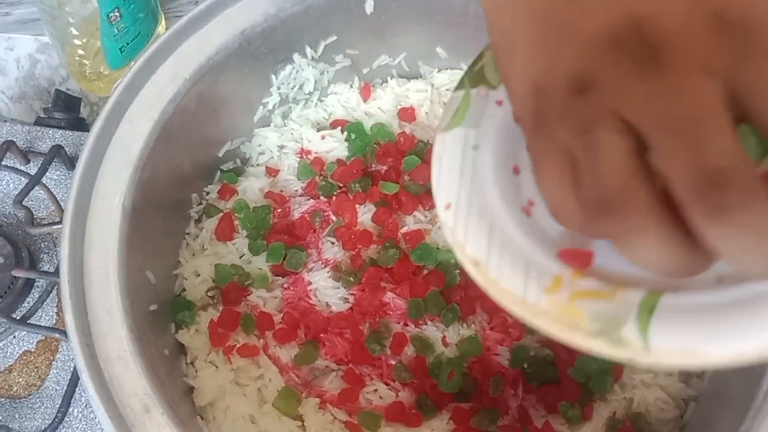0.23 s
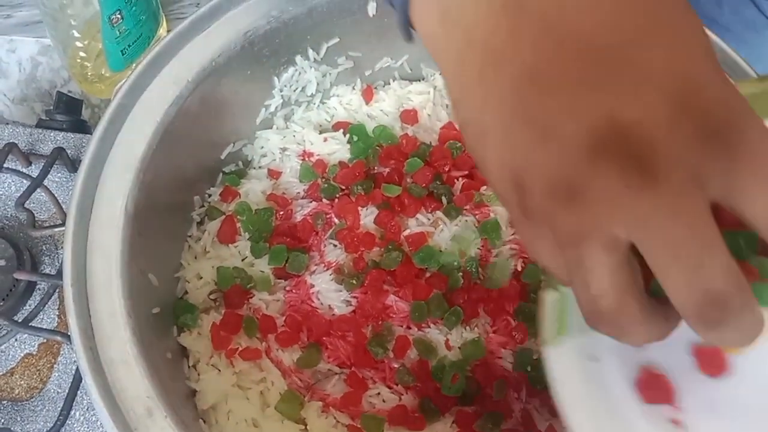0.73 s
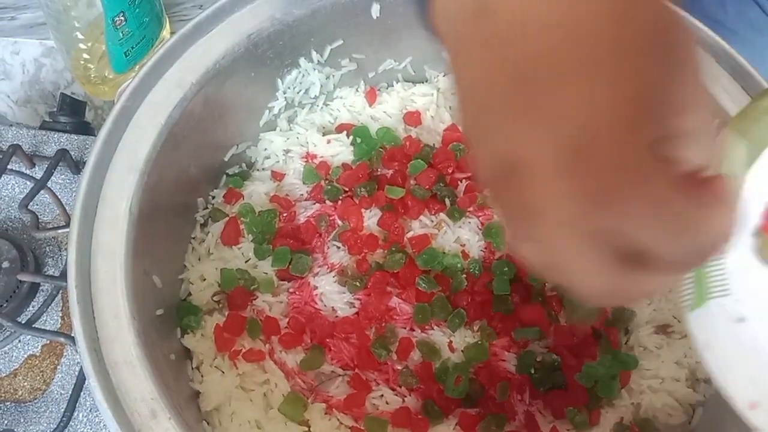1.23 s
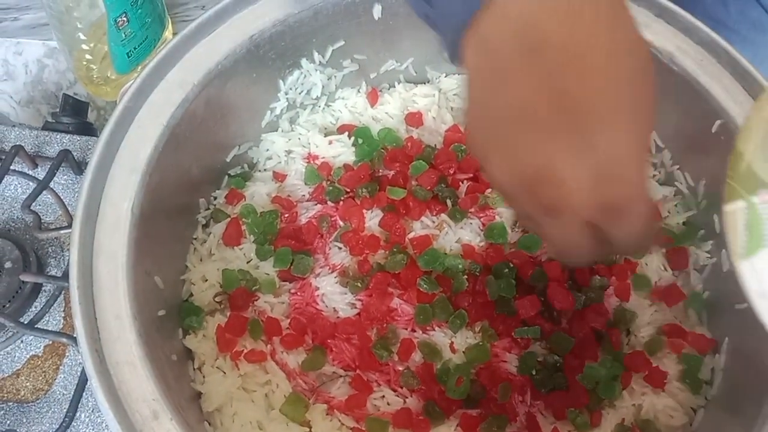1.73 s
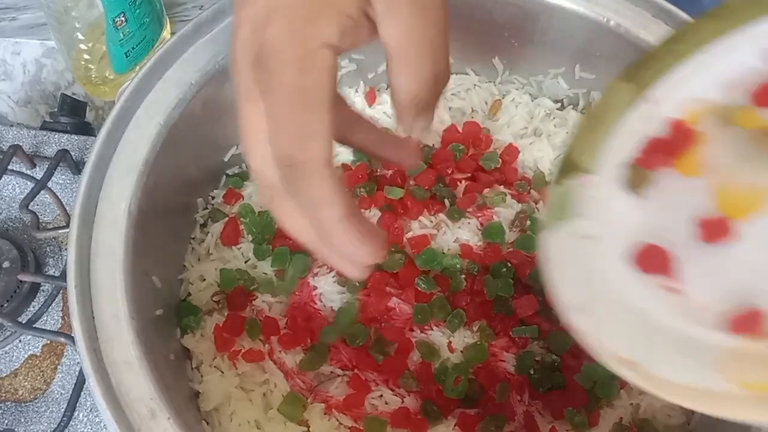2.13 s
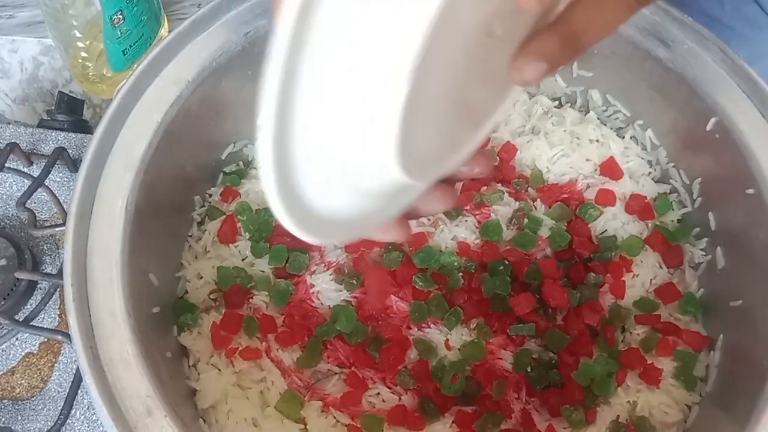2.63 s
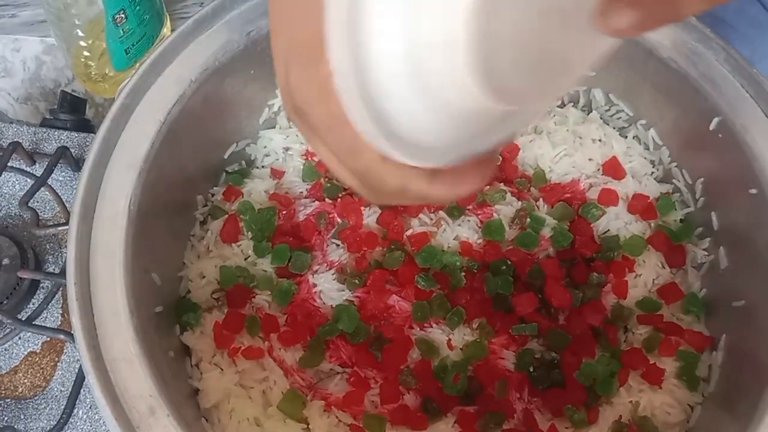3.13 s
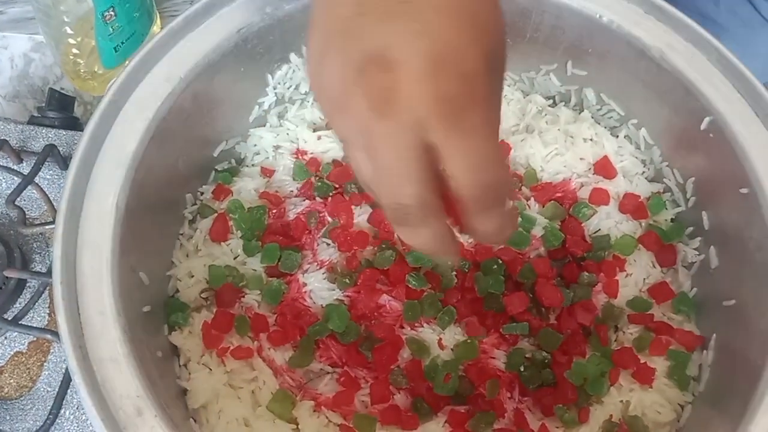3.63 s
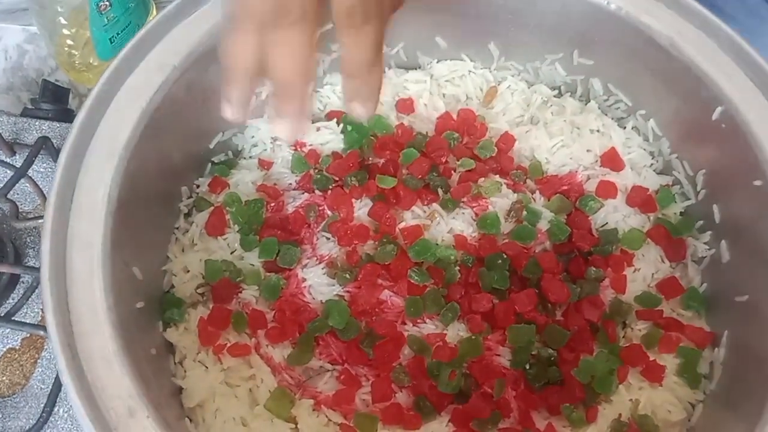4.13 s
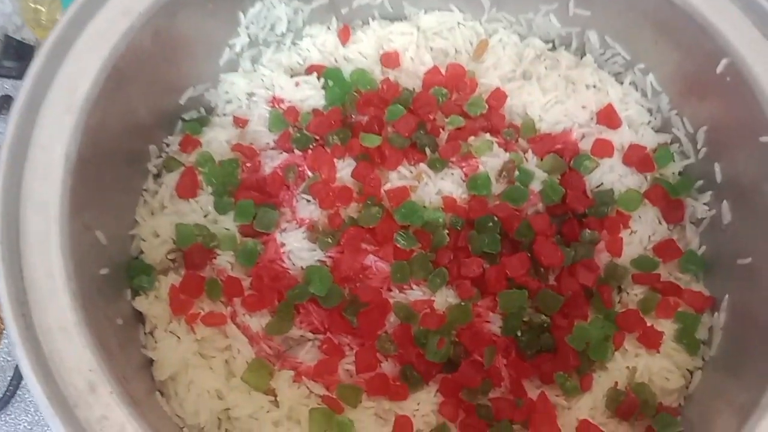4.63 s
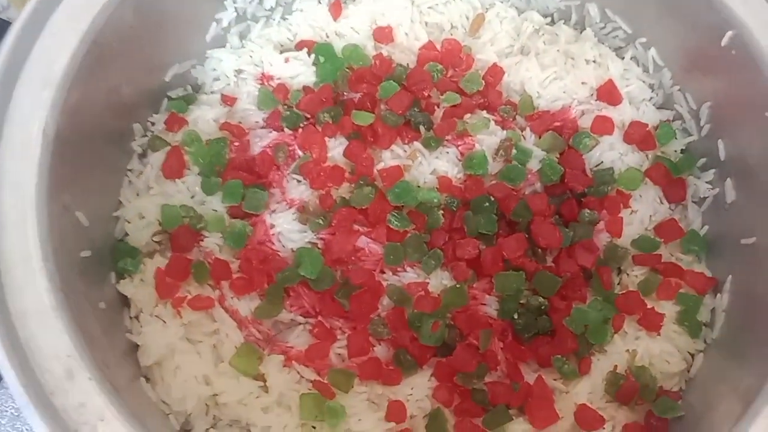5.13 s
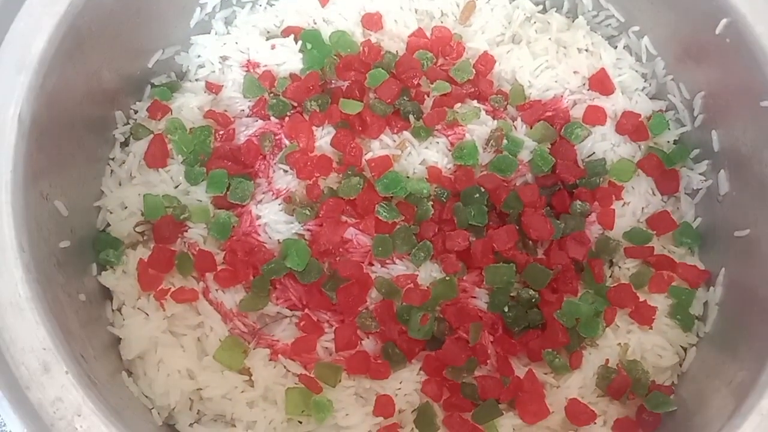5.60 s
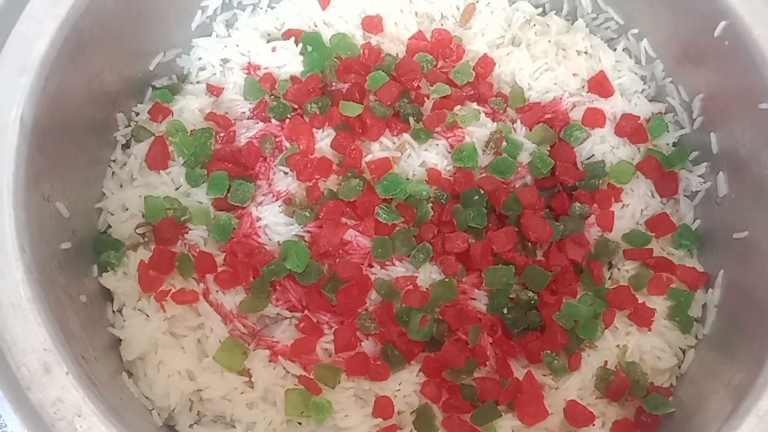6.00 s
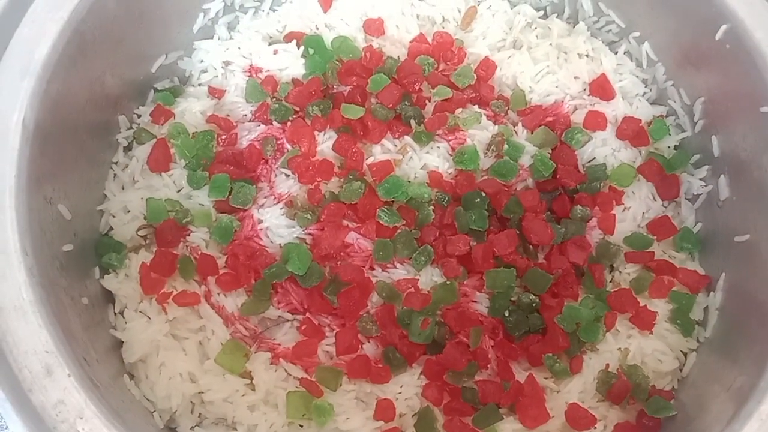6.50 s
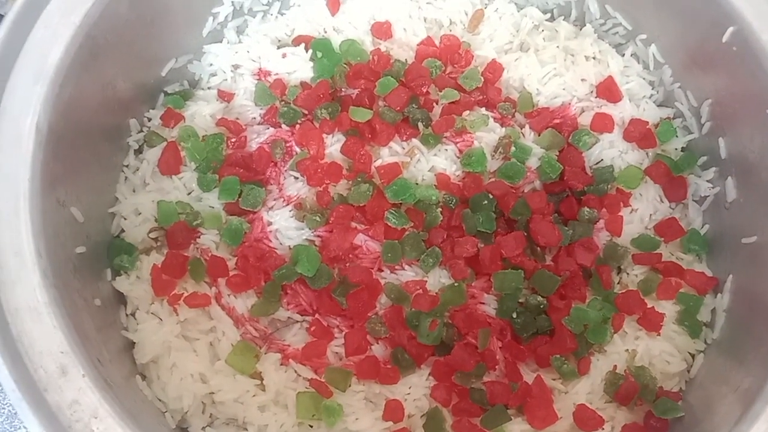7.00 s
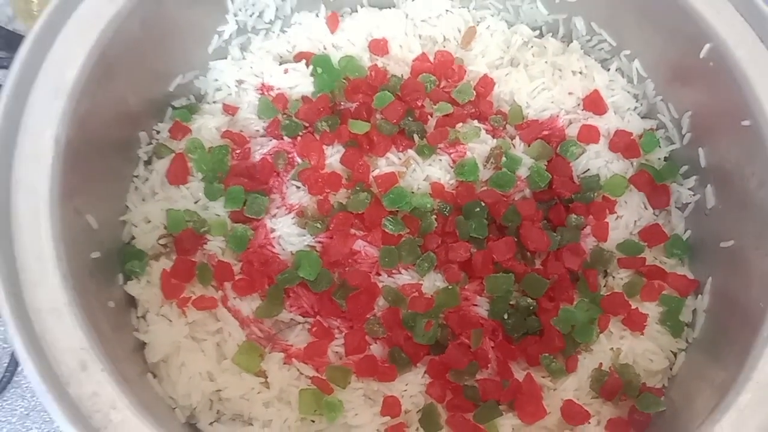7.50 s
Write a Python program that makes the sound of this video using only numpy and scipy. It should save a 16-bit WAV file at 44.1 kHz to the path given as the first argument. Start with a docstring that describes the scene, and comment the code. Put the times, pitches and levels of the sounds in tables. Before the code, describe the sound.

A big pot sizzles steadily on a gas burner while fruit pieces tick down, a plastic dish is set aside, and hard knocks follow.

```python
"""A wide pot of rice hisses and sizzles on a gas burner throughout: coloured noise in tiny bursts over a roar.
From the start, fruit scattered by hand ticks as short rings with cracks, and wood is dragged as jolted modes.
Near the middle a dish rim squeaks, then the plastic dish is put down and slid: chattering modes, then a rasp.
Later the wood is knocked hard, ringing on two modes at a time; near the end a finger bumps the phone.
A hard kitchen answers; the phone's noise suppressor pushes steady sound down, so that it breaks into patches."""
import sys
import numpy as np
from scipy import signal
from scipy.fft import rfft, irfft, next_fast_len
from scipy.io import wavfile
from scipy.ndimage import uniform_filter1d, minimum_filter1d, map_coordinates

SR = 44100
rng = np.random.default_rng(int(sys.argv[2]) if len(sys.argv) > 2 else 0)


def how_loud(loudness_db):
    """Turn decibels into a plain amplitude multiplier (0 dB gives 1, 20 dB gives 10)."""
    steps = np.asarray(loudness_db, float) / 20
    return 10 ** steps


def inscribe(sig):
    """Save sig as 16-bit PCM at rate SR to the path in sys.argv[1].

    A 1-D sig is mono; a 2-D sig holds one channel per row.
    Samples are clipped to [-1, 1] before scaling.
    """
    pcm = np.round(np.clip(np.atleast_2d(sig).T, -1, 1) * 32767)
    wavfile.write(sys.argv[1], SR, pcm.astype(np.int16))


N = 341775  # length in samples

# Ticks of fruit, nails and spitting fat.
# Each row: start in seconds, ring level in dB, ring pitch in Hz, crack level in dB before its colour.
TICKS = [(0.128, -30, 2480, -54), (0.186, -49, 3020, -44), (0.264, -38, 2680, -66),
         (0.3785, -34.5, 960, -60), (0.47, -43, 2400, -45), (0.484, -40.5, 3340, -60),
         (0.7939, -43, 1120, -60), (0.813, -42.5, 1230, -48.5), (0.8598, -46, 1000, -51),
         (1.009, -44, 3630, -60), (1.1729, -37.5, 2500, -72), (1.1887, -41.5, 1900, -46),
         (1.2116, -35, 2550, -39), (1.3324, -38.5, 2560, -51), (1.353, -35, 3480, -38),
         (1.4174, -35, 2520, -40), (1.4443, -25, 2810, -28), (1.5207, -38, 1370, -39.5),
         (1.6622, -35, 892, -35.5), (1.695, -36, 3270, -34), (1.669, -36, 2680, -46),
         (1.7186, -52, 3500, -46), (1.7963, -46, 2680, -59), (1.873, -39, 2730, -70),
         (1.9997, -35.5, 3390, -33), (2.3496, -34, 3220, -41), (2.3836, -40, 2340, -41.5),
         (2.7784, -37, 2940, -39), (3.888, -37, 3020, -70), (4.376, -36, 1020, -24),
         (4.4015, -27.5, 1120, -30), (4.5101, -27.5, 3370, -55), (4.785, -32, 1020, -29.5),
         (4.8364, -27, 2020, -49), (4.8747, -11, 2500, -24), (5.7725, -32.5, 2900, -48),
         (5.8483, -40, 2520, -34), (5.9554, -32, 3350, -52), (6.099, -42, 3260, -52),
         (6.1295, -43, 890, -36.5), (6.4173, -40, 3480, -37), (6.6964, -21, 890, -33.5),
         (6.7376, -31, 1330, -39), (6.75, -34, 4030, -34), (7.5545, -38, 1270, -39.5),
         (7.6852, -32, 1300, -47)]
# Colour of a tick's sharp edge. Each row: frequency in Hz, gain in dB.
CRACK_COLOUR = [(2500, -13), (4500, 9), (8000, -1), (9300, -16), (11300, -19), (12800, -9), (15600, -23),
                (16600, -27)]
# The dish rings as it lands or is jolted. Each row: time of the peak in seconds, level in dB, fade in seconds.
DISH_RINGS = [(4.41, -28, 0.31), (4.5, -37, 0.18), (4.59, -46.5, 1.3), (4.786, -48.5, 1.1),
              (4.904, -39, 0.16)]
# The dish rattles. Each row: time of the peak in seconds, level in dB, fade in seconds.
DISH_RATTLES = [(4.376, -37, 0.68), (4.43, -48, 0.53), (4.5, -59, 0.36)]
# The dish slides and rustles.
# Each row: time of the peak in seconds, level in dB, fade in seconds, middle of the rasp in Hz.
SLIDES = [(4.787, -29, 0.77, 1990), (4.835, -28.5, 0.24, 2000), (4.887, -25, 0.1, 2150),
          (4.909, -32, 0.89, 2180), (5.45, -51.5, 1.7, 2830), (5.712, -63, 0.46, 2950),
          (5.775, -44.5, 0.039, 2800), (5.82, -52, 1.3, 2700), (6.658, -32, .15, 2700),
          (6.702, -28.5, 0.43, 2200), (6.84, -33, 0.3, 1950), (7.02, -42.5, 0.19, 2850),
          (7.69, -44.5, 2.5, 2450)]
# Short squeaky scrapes of the dish rim. Each row: time of the peak in seconds, level in dB, fade in seconds.
SQUEAKS = [(3.786, -38.5, 0.31), (3.83, -43, 0.17), (3.868, -45, 0.15)]
# The squeak slips from the rim's upper modes to its lower: begin and end in seconds.
SQUEAK_SINKS_S = (3.78, 3.92)
# Resonances of the dish. Each row: pitch in Hz, width in Hz, relative level in dB (width and level of one pass).
DISH_MODES = [(520, 62, -4.5), (1020, 79, 4), (1244, 175, -1.5), (1414, 50, -0.5)]
# Resonances of the dish rim. Each row: pitch in Hz, width in Hz, relative level in dB, for one pass.
RIM_MODES = [(1870, 240, 1), (2100, 80, 0.5), (2520, 280, -4)]
# Colour of the sliding rasp. Each row: frequency in Hz, relative level in dB.
RASP_COLOUR = [(350, -56), (600, -53), (906, -27.5), (997, 11), (1140, -22), (1240, 7), (1350, -1),
               (2310, -1.5), (4050, -6), (7210, -15.5), (9240, -41.5), (13200, -46), (16000, -59)]
# Blunt knocks that ring on two modes. Each row: start in seconds, level in dB, lower mode in Hz,
# upper mode in Hz, upper mode in dB against the lower, time to fall by 60 dB in seconds.
KNOCKS = [(3.04, -39.5, 273, 391, -3.5, 0.24), (3.085, -36, 300, 408, -1.5, 0.077),
          (3.557, -29, 410, 672, 1.5, 0.048), (3.605, -40, 312, 520, -1.5, 0.07),
          (4.374, -34, 520, 992, 10.5, 0.14), (4.402, -35, 536, 1025, 9.5, 0.21),
          (5.843, -34.5, 2610, 3040, -9, 0.24), (6.647, -13.5, 464, 920, -2, 0.063),
          (6.70, -28, 473, 924, -4, 0.11), (6.738, -14.5, 396, 1367, -9, 0.066),
          (6.785, -22.5, 309, 915, -4, 0.07), (6.83, -16.5, 250, 907, -8, 0.093)]
# Wood dragged or bumped. Each row: time of the peak in seconds, level in dB at the pitch where it speaks,
# that pitch in Hz, fade in seconds.
DRAGS = [(.16, -69, 450, 0.55), (0.209, -60, 450, 0.096), (0.282, -42, 700, 0.076),
         (1.264, -59.5, 440, 0.089), (1.36, -62, 900, 0.55), (1.451, -47.5, 613, 0.054),
         (1.528, -63, 450, 0.23), (2.25, -54, 312, 0.25), (2.39, -59, 520, 0.65), (2.544, -66, 260, 0.28),
         (2.56, -54, 900, 0.4), (3.045, -38.5, 245, 0.22), (3.22, -59, 270, 0.4), (3.326, -68, 900, 0.052),
         (3.414, -66, 450, 0.51), (3.562, -49, 460, 0.37), (3.602, -55, 270, 0.11),
         (3.648, -42.5, 520, 0.076), (4.741, -49, 395, 0.54), (4.791, -40.5, 670, 0.98),
         (4.898, -46, 900, 0.11), (4.899, -52, 270, 0.15), (5.017, -45, 307, 0.26), (5.09, -54, 297, .25),
         (5.415, -57, 417, 0.27), (5.47, -46, 238, 0.67), (5.52, -40, 250, 0.2), (5.585, -46, 520, 0.17),
         (5.845, -56, 434, 0.27), (5.898, -40, 378, 0.15), (5.96, -58, 280, 0.17), (6.17, -65.5, 338, 0.73),
         (6.652, -23, 417, .15), (6.672, -23, 900, .6), (6.718, -23, 460, 0.45), (6.834, -26.5, 261, 0.28),
         (6.85, -34.5, 900, 0.55), (6.9, -33.5, 252, 0.32), (6.77, -32, 302, 0.41), (6.93, -53, 455, 0.3),
         (7.0, -43, 258, 0.28), (7.07, -58, 300, 0.34), (7.12, -62, 300, 0.13)]
# Resonances of the wood. Each row: pitch in Hz, width in Hz, relative level in dB, for one pass.
WOOD_MODES = [(236.8, 46, -4), (274, 20, 4), (315, 104, -2.5), (396, 62, -1), (482.4, 59, -0.5),
              (535.4, 43, -2), (689, 33, 1), (920, 52, 3.5), (1080, 82, -0.5), (1367, 65, 1),
              (1680, 280, -5)]
# Middle of the wood's deep, box and upper modes, in Hz.
WOOD_MIDDLES_HZ = (270, 441, 900)
# A finger bumps the phone. Each row: start in seconds, level of the spike in dB.
BUMPS = [(7.5128, -15.5)]
# The casing swings back after the bump: pitch in Hz, time to fall by 60 dB in seconds, dB against the spike.
CASING = (152, 0.015, -4)
# Level of the stove as heard: the phone's suppressor lets more roar through during loud knocks and slides.
# Each row: time in seconds, sizzle in dB, roar let through in dB, dull steam in dB.
STOVE_AS_HEARD = [(0, -52, -63, -57), (.3, -50.5, -66, -57.5), (.56, -54.5, -63.5, -60.5),
                  (.97, -53, -62, -57), (1.06, -57, -74, -64), (1.15, -54.5, -65, -61),
                  (1.2, -48.5, -60, -56.5), (1.45, -54.5, -61.5, -53.5), (1.62, -50.5, -63, -55),
                  (1.69, -49.5, -56, -50), (1.83, -49.5, -59.5, -57.5), (1.92, -52, -61.5, -59.5),
                  (2.5, -50.5, -63, -57), (2.75, -48.5, -63, -61.5), (2.87, -49, -58.5, -64.5),
                  (3.0, -48.5, -59, -60), (3.2, -49, -58.5, -63.5), (3.5, -49.5, -62, -57.5),
                  (3.74, -49.5, -66, -59), (3.87, -46, -55.5, -55.5), (4.08, -51.5, -73, -60.5),
                  (4.36, -48.5, -64, -66.5), (4.5, -44, -62, -48), (4.66, -44, -69, -63),
                  (4.85, -44, -49, -50), (5.2, -43, -54.5, -65), (5.35, -45, -71, -62),
                  (5.5, -41.5, -50, -53), (5.7, -43.5, -58.5, -56.5), (5.85, -40.5, -51.5, -64.5),
                  (6.0, -44.5, -53, -65), (6.07, -45.5, -71, -59), (6.13, -45, -53, -62),
                  (6.33, -46.5, -63, -72), (6.45, -47, -59, -68), (6.62, -47, -57.5, -73),
                  (6.84, -42, -32.5, -42), (7.0, -43.5, -57.5, -66.5), (7.45, -50, -62.5, -66),
                  (7.75, -47, -57, -60)]
# Colour of the sizzle. Each row: frequency in Hz, relative level in dB.
SIZZLE_COLOUR = [(1700, -51), (2200, -11.5), (2400, -5.5), (2900, 0.5), (3590, -2.5), (4550, -6),
                 (5000, -2.5), (5600, -14), (6100, -10), (6600, -13), (7570, -14.5), (8600, -21.5),
                 (9200, -38), (12400, -40)]
# Colour of the high spatter. Each row: frequency in Hz, relative level in dB.
SPATTER_COLOUR = [(8000, -34), (9000, -20), (9470, -6), (11200, -17), (12500, 7), (14000, -9), (15300, 2),
                  (15700, -20), (15900, -26)]
# Hollow resonances of the flame under the pot: the roar, then its overtone.
# Each row: pitch in Hz, width in Hz for one pass, level in dB (evened out, as each is scaled alone).
FLAME_MODES = [(842.5, 125, 0.5), (1281, 240, 0)]
# Resonances of the low hum. Each row: pitch in Hz, width in Hz, relative level in dB, for one pass.
HUM_MODES = [(143.7, 59, 2.5), (75, 125, -6.5)]
# The low hum swells briefly. Each row: time of the peak in seconds, level in dB, fade in seconds.
HUM_SWELLS = [(.17, -69, 0.37), (.27, -59, 0.11), (.39, -71, 0.25), (.97, -64, 0.086), (1.23, -68, 0.12),
              (1.69, -63, .2), (1.79, -62, .2), (2.25, -59, 0.18), (2.36, -72, 0.22), (2.5, -73, 0.43),
              (2.8, -80, 0.46), (3.06, -78, .5), (3.6, -70, 0.35), (3.83, -61, 0.27), (3.89, -50, 0.11),
              (3.97, -71, 0.12), (4.17, -60, .4), (4.33, -66, 0.18), (4.77, -55.5, 0.1), (5.33, -73, 0.23),
              (5.58, -60.5, 0.29), (5.91, -54.5, 0.067), (6.71, -55, 0.56), (6.86, -57, 0.22),
              (7.31, -64, 0.28), (7.51, -65, 0.36), (7.7, -70, 0.41)]
# Echo of the kitchen. Each row: frequency in Hz, time to fall by 60 dB in seconds.
KITCHEN = [(200, 0.18), (1000, 0.26), (3000, 0.13), (10000, 0.11)]
# Dips of the microphone port. Each row: frequency in Hz, half width in Hz, depth in dB.
NOTCHES = [(4970, 130, -16), (6080, 150, -9)]


def unit(x):
    """Scaled to rms 1."""
    return x / np.sqrt(np.mean(x ** 2) + 1e-20)


def along(points, hz):
    """Joins (Hz, value) points on a log frequency axis."""
    f, v = np.transpose(points)
    return np.interp(np.log(hz + 1), np.log(f + 1), v)


def curves(rows):
    """One value per sample for each column after the time."""
    s, *columns = np.transpose(rows)
    return [np.interp(np.arange(N) / SR, s, column) for column in columns]


def filtered(x, response):
    """Shapes the spectrum of x by a complex response of frequency."""
    m = next_fast_len(N + SR // 2)
    return irfft(rfft(x, m) * response(np.fft.rfftfreq(m, 1 / SR)), m)[:N]


def coloured(x, points):
    """Shapes the spectrum of x by (Hz, dB) points."""
    return filtered(x, lambda f: how_loud(along(points, f)))


def resonances(modes):
    """Causal response of (Hz, width, dB) modes, with signs that alternate."""
    def response(f):
        return sum((-1) ** k * how_loud(db) * 1j * f * width / (hz * hz - f * f + 1j * f * width)
                   for k, (hz, width, db) in enumerate(modes))
    return response


def tuned(x, modes):
    """Passes x through the modes twice, for dark valleys between them; rms 1."""
    return unit(filtered(x, lambda f: resonances(modes)(f) ** 2))


def grains(per_s, spread_db, hiss, puff_s=0.00084):
    """Random short puffs of uneven but bounded size on a bed of noise, rms 1."""
    timing, luck = rng.random((2, N))
    size = how_loud(-spread_db * np.log(luck + 1 / 30))
    hits = (timing < per_s / SR) * size
    puffs = signal.lfilter([1], [1, -np.exp(-1 / (puff_s * SR))], hits)
    return unit(np.hypot(unit(puffs), hiss) * rng.standard_normal(N))


def patchy(x, depth_db):
    """Narrow bands swell and fade on their own over about a tenth of a second; rms 1."""
    z = signal.stft(x, nperseg=512)[2]
    field = uniform_filter1d(rng.standard_normal(z.shape), size=3, axis=0)
    field = uniform_filter1d(field, size=18, axis=1)
    return unit(signal.istft(z * how_loud(depth_db * unit(field)), nperseg=512)[1][:N])


def strokes(rows, rise_s):
    """Sum of (s, peak dB, fade s) swells: up 60 dB in rise_s, down 60 dB in the fade."""
    out = np.zeros(N)
    for s, db, fade in rows:
        start = max(round((s - rise_s) * SR), 0)
        t = np.arange(start, min(round((s + fade) * SR), N)) / SR - s
        out[start:start + len(t)] += how_loud(db - 60 * np.maximum(-t / rise_s, t / fade))
    return out


def wobble(rate):
    """A smooth random curve through rate random points a second."""
    return map_coordinates(rng.standard_normal(400), [np.arange(N) * rate / SR])


def ticks():
    """A hard touch starts a short ring, loudest in its first cycles, with a noisy body and a sharper crack."""
    click_db, click_cycles, contact_s = 5, 10, .0003
    rings, cracks, t = np.zeros(N + SR), np.zeros(N + SR), np.arange(SR // 8) / SR
    noise = rng.standard_normal((len(TICKS), 2, len(t)))
    for (s, db, hz, crack_db), (soft, sharp) in zip(TICKS, noise):
        t60 = 0.022 * (1000 / hz) ** 0.23  # seconds; higher ticks die sooner
        fade = how_loud(-60 * t / t60) + how_loud(click_db - 60 * t * hz / click_cycles)
        ring = np.sin(2 * np.pi * hz * t) * fade * (1 - np.exp(-t / contact_s))
        band = signal.butter(2, [0.81 * hz, min(1.13 * hz, 9000)], "band", fs=SR)
        body = signal.lfilter(*band, soft) * how_loud(4.0 - 50 * t / t60)
        start = round(s * SR)
        rings[start:][:len(t)] += how_loud(db) * (ring + body)
        cracks[start:][:len(t)] += how_loud(crack_db - 60 * t / 0.012) * sharp
    thin_rings = filtered(rings[:N], lambda f: (1j * f / (450 + 1j * f)) ** 2)  # less bass
    return thin_rings + coloured(cracks[:N], CRACK_COLOUR)


def dish():
    """Chatter makes the dish rim squeak, and later sets the dish ringing as it lands; sliding makes a rasp of
    dense grains."""
    chatter = grains(per_s=250, spread_db=2.5, hiss=1.3)
    ring = strokes(DISH_RINGS, rise_s=0.089) * tuned(chatter, DISH_MODES)
    clatter = filtered(chatter, lambda f: how_loud(along(RASP_COLOUR, f)) * (f / 3000) ** 0.69)
    rattle = strokes(DISH_RATTLES, rise_s=0.02) * unit(clatter)

    rasp = coloured(grains(per_s=750, spread_db=1.0, hiss=1.4), RASP_COLOUR)
    low, high = (unit(filtered(rasp, resonances([(hz, 1300, 0)]))) for hz in (1900, 3100))
    middle_hz, = curves([(row[0], row[-1]) for row in SLIDES])
    up = np.clip((middle_hz - 1900) / 1200, 0, 1)  # share of the brighter rasp
    scrape = 0.52 * unit(rasp) + 0.29 * (np.sqrt(1 - up) * low + np.sqrt(up) * high)
    slide = strokes([row[:-1] for row in SLIDES], rise_s=0.043) * scrape

    sunk = np.interp(np.arange(N) / SR, SQUEAK_SINKS_S, (0, 1))
    upper, lower = tuned(chatter, RIM_MODES[1:]), tuned(chatter, RIM_MODES[:-1])
    squeak = strokes(SQUEAKS, rise_s=.05) * (np.sqrt(1 - sunk) * upper + np.sqrt(sunk) * lower)
    return squeak + ring + rattle + slide


def knocks():
    """A soft contact swells for a few milliseconds, then both modes die away."""
    out, t = np.zeros(N + SR), np.arange(SR // 3) / SR
    for s, db, low_hz, high_hz, high_db, t60 in KNOCKS:
        ring = np.sin(2 * np.pi * low_hz * t) + how_loud(high_db) * np.sin(2 * np.pi * high_hz * t)
        out[round(s * SR):][:len(t)] += how_loud(db - 60 * t / t60) * (1 - np.exp(-t / 0.0041)) * ring
    return out[:N]


def wood():
    """Stick-slip jolts shake a wooden frame; where it is pushed decides which modes speak."""
    jolts = grains(per_s=200, spread_db=3, hiss=1.1)
    out = np.zeros(N)
    for middle_hz, (low, high) in zip(WOOD_MIDDLES_HZ, [(0, 340), (340, 620), (620, 2000)]):
        modes = [mode for mode in WOOD_MODES if low <= mode[0] < high]
        # a group of modes speaks 19.5 dB softer for each octave away from the push
        pushes = [(s, db - 19.5 * abs(np.log2(middle_hz / hz)), fade) for s, db, hz, fade in DRAGS]
        out += strokes(pushes, rise_s=.035) * tuned(jolts, modes)
    return out


def bump():
    """A sharp inward spike, then a slower swing back of the casing."""
    out, t = np.zeros(N), np.arange(SR // 20) / SR
    hz, t60, swing_db = CASING
    for s, db in BUMPS:
        spike = -(t / 0.00013) * np.exp(1 - t / 0.00013)
        swing = how_loud(swing_db - 60 * t / t60) * np.sin(2 * np.pi * hz * t + 0.39) * (1 - np.exp(-t / .0003))
        out[round(s * SR):][:len(t)] = how_loud(db) * (spike + swing)
    return out


def stove():
    """Fat fizzes in tiny bursts over the steam; the flame roars in the hollow under the pot."""
    sizzle_db, roar_db, steam_db = curves(STOVE_AS_HEARD)
    flutter_db = 2.5  # flame and spatter flutter
    bursts = grains(per_s=260, spread_db=2.8, hiss=1.2, puff_s=0.001)
    fizz = patchy(coloured(bursts, SIZZLE_COLOUR), depth_db=1.5)
    steam = patchy(tuned(bursts, [(1470, 360, -1.2), (2310, 1080, -0.83)]), depth_db=3.5)
    spits = grains(per_s=30, spread_db=2.5, hiss=2.1, puff_s=.004)
    spatter = unit(coloured(spits + 0.52 * bursts, SPATTER_COLOUR))
    rumble = how_loud(2.6 * wobble(10)) * tuned(rng.standard_normal(N), [(45, 55, 0)])
    # spatter and rumble lie under the sizzle and follow its level
    hiss = fizz + how_loud(-30.5 + flutter_db * wobble(10)) * spatter + how_loud(-38) * rumble

    roar, overtone = (patchy(tuned(rng.standard_normal(N), [mode]), depth_db=2.5) for mode in FLAME_MODES)
    flame = how_loud(roar_db + flutter_db * wobble(12)) * roar
    flame += how_loud(roar_db - 3.5 + flutter_db * wobble(12)) * overtone
    murmur = patchy(tuned(rng.standard_normal(N), [(343, 320, 0)]), depth_db=3.0)
    murmur *= how_loud(-73 + 0.62 * (sizzle_db - sizzle_db.mean()))  # dull and low, rising with the sizzle
    hum = tuned(rng.standard_normal(N), HUM_MODES)
    hum *= how_loud(-83.5) + strokes(HUM_SWELLS, rise_s=0.15)
    return how_loud(sizzle_db) * hiss + how_loud(steam_db) * steam + flame + murmur + hum


def kitchen(x):
    """Hard walls answer after a short wait; each frequency dies at its own speed."""
    hz, t, z = signal.stft(rng.standard_normal(SR // 2), SR, nperseg=256)
    fading = z * how_loud(-60 * t / along(KITCHEN, hz)[:, None])
    tail = signal.istft(fading, SR, nperseg=256)[1]
    return signal.fftconvolve(np.pad(x, (300, 0)), tail / np.linalg.norm(tail))[:N]


def scene():
    """Adds the sources; the ticks, and more faintly the dish, wood and knocks, also sound in the room."""
    near = ticks()
    far = dish() + knocks() + wood()
    room = kitchen(how_loud(-9.5) * near + how_loud(-13.0) * far)
    return (near + far + bump() + stove() + room)[None]


def suppressor(x, over_db, depth_db):
    """Bands close to their own quiet level are turned down, so the hiss breaks into patches."""
    z = signal.stft(x, nperseg=512)[2]
    power = uniform_filter1d(np.abs(z) ** 2, size=4, axis=1)
    power = uniform_filter1d(power, size=6, axis=2)
    quiet = uniform_filter1d(minimum_filter1d(power, size=90, axis=2), size=90, axis=2)
    gain = 1 - how_loud(2 * over_db) * quiet / (np.abs(power) + 1e-18)
    gain = np.maximum(gain, how_loud(depth_db))
    return signal.istft(z * gain, nperseg=512)[1][:, :N]


def top_cut(x):
    """Nothing passes above the cut-off."""
    return signal.sosfilt(signal.butter(12, 16510, fs=SR, output="sos"), x)


def record(dry):
    """The microphone cuts bass, dips at two pitches and dulls the very top; then the noise suppressor works."""
    heard = signal.sosfilt(signal.butter(2, 80, "high", fs=SR, output="sos"), dry)

    def microphone(f):
        dips_db = sum(db / (1 + ((f - hz) / width) ** 2) for hz, width, db in NOTCHES)
        return np.where(f < 15750, 1, how_loud(-26)) * how_loud(dips_db)

    heard = filtered(heard[0], microphone)[None]
    heard = suppressor(heard, over_db=-1.0, depth_db=-4.5)
    return top_cut(heard)


dry = scene()
out = record(dry)
inscribe(out)
```